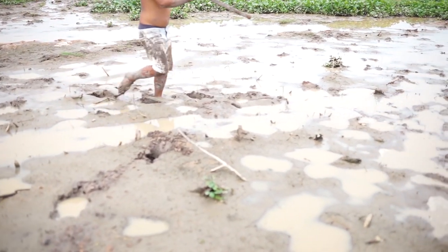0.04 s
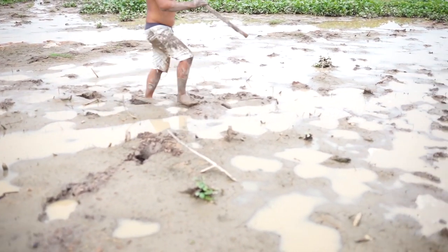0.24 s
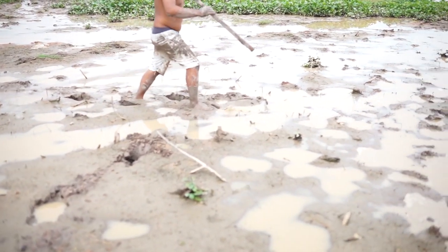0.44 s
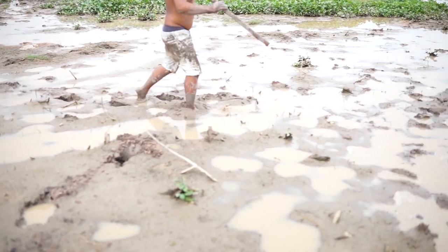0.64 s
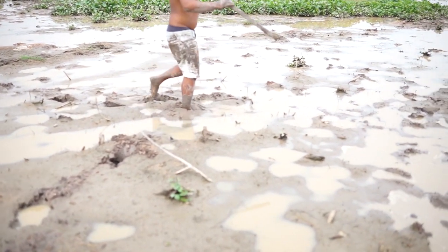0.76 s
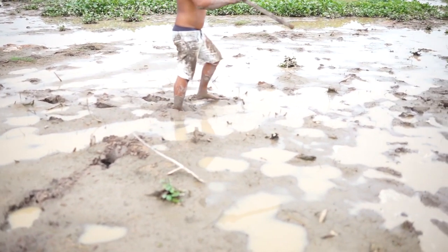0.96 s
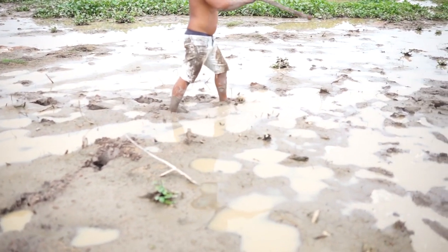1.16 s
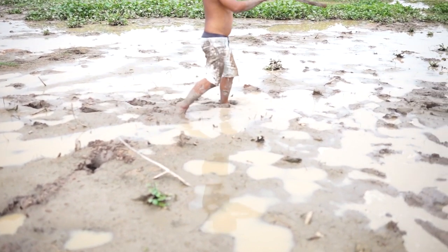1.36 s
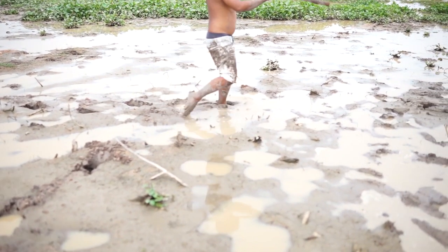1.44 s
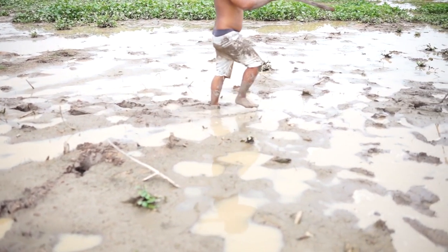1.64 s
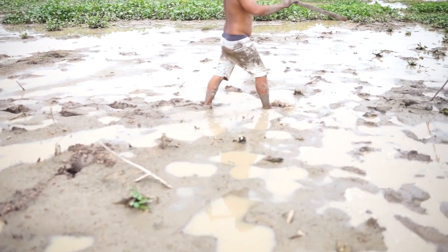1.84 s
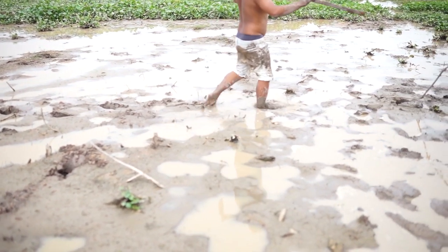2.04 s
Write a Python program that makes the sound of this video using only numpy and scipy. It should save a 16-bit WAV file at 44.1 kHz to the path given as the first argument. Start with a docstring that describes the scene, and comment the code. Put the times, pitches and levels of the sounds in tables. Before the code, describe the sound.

Wet, sucking barefoot steps in a flooded mud field, with low gusts of wind.

```python
"""Bare feet wading through a flooded mud field, a few metres from a stereo microphone.
Mud slaps, sucks and snaps as it tears loose, air pockets pop, and thrown water falls as fine drops.
Gusts buffet the microphone, mostly its left port, which is also shaded from the walker.
Some small animal trills briefly over the faint hiss of the open air."""
import sys
import numpy as np
from scipy import signal
from scipy.fft import rfft, irfft
from scipy.io import wavfile

SR = 44100
rng = np.random.default_rng(int(sys.argv[2]) if len(sys.argv) > 2 else 0)


def materialize(psi):
    """Save the field psi as 16-bit PCM at rate SR to the path in sys.argv[1].

    A 1-D psi becomes a single channel; in a 2-D psi each row is a channel.
    """
    bounded = np.clip(np.atleast_2d(psi).T, -1, 1)
    quanta = np.round(bounded * 32767).astype(np.int16)
    wavfile.write(sys.argv[1], SR, quanta)


N = 92610

# Mud slapping and tearing loose underfoot.
# Each row: start in seconds, level in dB, centre in Hz, width in octaves, decay in seconds.
MUD_SQUELCHES = [(.0215, -39, 1070, 0.8, 0.0015), (0.822, -39, 1530, 0.27, 0.015),
                 (0.1432, -30.5, 6000, 1.6, 0.0029), (0.3535, -32.5, 2200, 0.99, 0.0096),
                 (0.368, -34, 3220, 1.4, 0.013), (.394, -37, 4600, 0.53, 0.0093),
                 (0.494, -27.5, 4760, 0.86, 0.0031), (0.5022, -28.5, 4870, 0.25, 0.0014),
                 (0.5317, -27, 6500, 0.5, 0.0019), (0.547, -26, 2700, 1.34, 0.0082),
                 (0.614, -30.5, 3400, 4.8, 0.0059), (0.633, -33, 1550, 0.34, 0.0021),
                 (1.0913, -24, 5000, 1.8, 0.0028), (1.0939, -17.5, 5200, 0.83, 0.0018),
                 (1.1411, -23.5, 5700, 1.4, 0.0019), (1.153, -29, 6000, 1.4, 0.0024),
                 (1.163, -17.5, 4840, 1.9, 0.003), (1.1785, -19, 2770, 0.3, 0.0015),
                 (1.372, -35, 4800, 1.1, 0.0097), (1.396, -36, 3000, 1.8, 0.0092),
                 (1.554, -39.5, 4460, 1.6, 0.0081), (1.802, -27.5, 7200, 0.81, 0.0051),
                 (1.848, -29.5, 5200, 0.76, 0.01), (2.031, -19.5, 1990, 0.57, 0.0011),
                 (2.051, -35, 3600, 1.3, 0.0025), (2.064, -34.5, 4200, 0.91, 0.0058),
                 (2.0857, -28.5, 3900, 0.58, 0.0017), (2.092, -23, 2000, 0.81, 0.0018)]
# Films of mud parting. Each row: time in seconds, peak in dB, centre in Hz, width in octaves.
MUD_SNAPS = [(.1433, -16, 9800, 0.36), (.5033, -22, 5400, .5), (.5323, -17, 8500, 0.32),
             (0.548, -24, 3000, 0.71), (1.095, -15, 8600, 0.88), (1.142, -26, 6300, .8),
             (1.1645, -7.5, 6060, 0.54), (1.1781, -12, 3000, 0.84)]
# Air pockets popping in the mud.
# Each row: start in seconds, pitch in Hz, gain in dB, decay in seconds, glide in octaves per second.
AIR_POCKETS = [(.021, 846, -14, 0.00097, 10), (.1435, 2260, -26.5, 0.0013, 0),
               (0.357, 2450, -23, 0.0009, 23), (.373, 4300, -27.5, 0.0023, 46),
               (0.452, 1910, -38, 0.0058, -9), (0.509, 4440, -39, 0.0024, -9),
               (0.496, 4000, -29, 0.0028, 56), (0.5487, 825, -31, 0.0063, 8),
               (0.633, 1296, -30.5, 0.0075, 12), (0.6385, 1700, -30.5, 0.0051, 74),
               (0.781, 905, -33, 0.0059, 17), (0.82, 940, -35.5, 0.0058, 14),
               (1.1619, 1470, -19, 0.0017, 33), (1.1787, 2150, -32.5, 0.0047, -12),
               (1.338, 835, -25.5, 0.0016, 13), (1.343, 2670, -29, 0.0022, 0), (1.42, 926, -36, 0.015, -19),
               (1.423, 2720, -33, 0.0028, -5), (1.753, 2450, -41.5, 0.0068, 7),
               (2.0295, 1036, -20, 0.0035, 20), (2.037, 957, -24, 0.0038, 24),
               (2.042, 2576, -33, 0.0071, -50.5), (2.059, 2750, -22.5, 0.0021, -37),
               (2.068, 716, -24.5, 0.0043, 39), (2.077, 1850, -25, 0.0022, 32),
               (2.0894, 2740, -23.5, 0.0024, 3), (2.091, 1020, -19, 0.0015, 10)]
# Water pushed and thrown by a foot.
# Each row: peak time, rise and fall in seconds, level in dB, centre in Hz, width in octaves.
WATER_SPRAYS = [(.008, 0.032, 0.022, -37, 4560, 5.8), (.1, 0.064, 0.11, -48.5, 5600, 1.1),
                (.45, 0.2, 0.12, -46.5, 3000, 5.7), (.815, 0.12, 0.045, -45, 1740, 0.88),
                (1.04, 0.24, 0.22, -48.5, 4700, 0.29), (1.176, 0.026, 0.0072, -31.5, 6360, 0.43),
                (1.404, 0.054, 0.14, -49, 2120, 0.91), (1.666, 0.042, 0.086, -42, 4100, 1),
                (1.83, 0.023, 0.12, -41, 7350, 0.58), (1.902, 0.029, 0.022, -29, 3440, 1.94),
                (2.085, 0.14, 0.037, -37, 3400, 11)]
# Steady wind on the microphone's ports. Each row: time in seconds, left level in dB, right level in dB.
WIND_LEVELS = [(0, -29, -32), (0.191, -26, -36), (.45, -17, -33.5), (.62, -14.5, -22), (.78, -17, -33.5),
               (1.04, -16.5, -29.5), (1.27, -20, -27), (1.418, -18.5, -29), (1.68, -21, -30.5),
               (1.82, -32.5, -39), (2.1, -34, -38)]
# The spectrum of that wind. Each row: frequency in Hz, relative level in dB.
WIND_SPECTRUM = [(12, -24), (25, -7.5), (45, 0), (70, 2.5), (115, -1.5), (160, -12), (250, -22.5),
                 (400, -35.5), (800, -54)]
# Eddies thumping one port. Each row: peak time in seconds, half length in seconds, level in dB,
# corner in Hz, port (0 left, 1 right).
WIND_EDDIES = [(0.052, 0.049, -23, 81, 0), (0.232, 0.012, -14, 83, 0), (0.286, 0.021, -11.5, 76, 0),
               (0.355, 0.0029, -22, 358, 1), (0.39, 0.0042, -5.5, 114, 0), (0.423, 0.012, -14.5, 150, 0),
               (.505, 0.0034, -22, 600, 0), (0.512, 0.016, -13.5, 227, 0), (0.539, 0.01, -4.5, 102, 0),
               (0.563, 0.013, -29, 191, 1), (0.584, 0.014, -16.5, 203, 0), (0.65, 0.024, -12, 159, 0),
               (0.674, 0.015, -11.5, 187, 0), (0.764, 0.017, -5.5, 84, 0), (0.795, 0.0072, -8, 203, 0),
               (0.829, 0.018, -15, 271, 0), (0.867, 0.019, -21.5, 177, 1), (0.879, 0.016, -9.5, 214, 0),
               (0.96, 0.011, -9, 197, 0), (1.016, 0.019, -20, 187, 0), (1.129, 0.017, -9.5, 142, 0),
               (1.17, 0.008, -8, 150, 0), (1.211, 0.017, -20, 187, 1), (1.2134, 0.0039, -14.5, 397, 0),
               (1.222, 0.013, -6.5, 171, 0), (1.281, 0.0014, -19.5, 437, 0), (1.305, 0.02, -12.5, 157, 0),
               (1.382, 0.024, -9, 108, 0), (1.428, 0.02, -11.5, 128, 0), (1.492, 0.015, -7.5, 84, 0),
               (1.499, 0.0031, -25, 750, 0), (1.553, 0.0085, -12.5, 140, 0), (1.611, 0.017, -16.5, 140, 0),
               (1.649, 0.0054, -14, 105, 0), (1.766, 0.0078, -22.5, 137, 0), (1.874, 0.034, -25, 75, 0)]
# The animal's calls. Each row: start and length in seconds, pulses per second, pitch in Hz,
# level in dB, second resonance in Hz, its level in dB.
ANIMAL_TRILLS = [(-.06, 0.099, 90, 3030, -43.5, 5500, -49.5), (0.74, 0.17, 92, 3070, -42.5, 5130, -46.5),
                 (1.614, 0.082, 96.7, 5330, -45, 3470, -48)]
# The hiss of the open field. Each row: frequency in Hz, relative level in dB.
AIR_SPECTRUM = [(100, -1.5), (350, 6), (520, -2.5), (700, -4), (1100, -4.5), (1500, -13), (2100, -7.5),
                (3300, -27), (5000, -22.5), (7000, -8), (9300, -4.5), (11000, -15)]
# The shading of the left port from the walker. Each row: frequency in Hz, gain in dB.
LEFT_SHADE = [(500, -3), (1100, 1.5), (2000, -1.5), (3200, -2), (5500, -11), (10000, -6.5)]
# The microphone's treble roll-off. Each row: frequency in Hz, gain in dB.
MIC_TREBLE = [(6500, -0.5), (8000, -7.5), (10500, -15)]


def squelches():
    """Mud slaps and tears loose under a foot: a sharp wet burst, then a weaker dribble."""
    attack_s, dribble_db, dribble_s = 0.00043, -36.5, 0.061
    out, drops = np.zeros(N), droplets(spread_db=2)
    for start, db, hz, octaves, decay in MUD_SQUELCHES:
        age = np.maximum(clock() - start, 0)
        attack = np.minimum(age / attack_s, 1)
        fall = np.exp(-age / decay) + undb(dribble_db) * np.exp(-age / dribble_s)
        burst = even(band(random_shift(drops), hz, octaves), span_s=0.0027)
        out += undb(db) * attack * fall * burst
    return out


def snaps():
    """A film of mud parts all at once, with a dry tick."""
    out = np.zeros(N)
    for when, db, hz, octaves in MUD_SNAPS:
        tick = band(signal.unit_impulse(N, int(when * SR)), hz, octaves)
        out += undb(db) * tick / tick.max()
    return out


def bubbles():
    """Air pockets pop, ring briefly and glide as they change shape."""
    attack_s = 0.0012
    out, age = np.zeros(N + SR), np.arange(SR // 25) / SR
    for start, hz, db, decay, glide in AIR_POCKETS:
        pitch = np.minimum(hz * 2 ** (glide * age), SR / 4)
        envelope = np.minimum(age / attack_s, 1) * np.exp(-age / decay)
        at = int(start * SR)
        out[at:at + len(age)] += undb(db) * envelope * np.sin(2 * np.pi * np.cumsum(pitch) / SR)
    return out[:N]


def sprays():
    """Water thrown by a foot swells and falls away as fine droplets."""
    out, drops = np.zeros(N), droplets(spread_db=6)  # thrown drops vary more in size than a squelch's
    for peak, rise, fall, db, hz, octaves in WATER_SPRAYS:
        age = clock() - peak
        swell = np.exp(-np.maximum(-age / rise, age / fall))
        out += undb(db) * swell * band(random_shift(drops), hz, octaves)
    return out


def droplets(spread_db):
    """Dense tiny drops of uneven size and pitch, each ringing a few rising cycles, in a fine mist."""
    count, drops_per_s, low_hz, high_hz = 10000, 5000, 830, 12000
    decay_cycles, glide = 1.4, 0.019
    when, pitch, size = rng.random(count), rng.random(count), rng.standard_normal(count)
    hz = low_hz + (high_hz - low_hz) * pitch ** 1.5
    steps = np.arange(160)
    cycles = hz[:, None] * steps / SR
    envelopes = np.exp(-cycles / decay_cycles) * (1 - steps / len(steps))
    gains = undb(spread_db * np.minimum(size, 3)) * (hz / high_hz) ** 1.17
    rings = gains[:, None] * envelopes * np.sin(2 * np.pi * cycles * (1 + glide * cycles))
    starts = (when * count / drops_per_s * SR).astype(int)
    stream = np.bincount((starts[:, None] + steps).ravel(), rings.ravel())
    mist = 0.5 * noise()
    return unit(np.resize(stream, N)) + mist


def stray_drops():
    """Stray drops tick back into the puddles around the walker."""
    drops_per_s, spread_db, level_db = 79, 4, -58.5
    hits = rng.random(N) < drops_per_s / SR
    sizes = undb(spread_db * np.clip(noise(), -2, 2))
    return undb(level_db) * band(hits * sizes, hz=3350, octaves=1.83)


def wind():
    """Wind right on the microphone: a low churning on each port, and eddies that thump against it."""
    port_low_hz, port_high_hz, eddy_order = 38, 820, 2.99
    out = np.zeros((2, N))
    times, *levels = np.array(WIND_LEVELS).T
    for port, db in enumerate(levels):
        churn = even(colour(noise(), WIND_SPECTRUM), span_s=0.13)
        out[port] = undb(np.interp(clock(), times, db)) * churn
    port_band = 1 / np.sqrt((1 + (port_low_hz / bins()) ** 4) * (1 + (bins() / port_high_hz) ** 4))
    for peak, half_length, db, corner_hz, port in WIND_EDDIES:
        lowpass = 1 / np.sqrt(1 + (bins() / corner_hz) ** (2 * eddy_order))
        eddy = irfft(rfft(noise()) * port_band * lowpass, N)
        swell = np.exp(-.5 * ((clock() - peak) / half_length) ** 2)
        out[port] += undb(db) * swell * even(eddy, span_s=0.022)
    return out


def trills():
    """A small animal: fast, uneven pulses on an arched tone, rasping at its octave and a resonance."""
    jitter_cycles, arch_hz, octave_db, rasp_octaves = 0.072, 183, -6, 0.086
    out = np.zeros(N)
    for start, length, rate, hz, db, second_hz, second_db in ANIMAL_TRILLS:
        age = clock() - start
        swell = np.sin(np.pi * np.clip(age / length, 0, 1))
        beat = rate * age + jitter_cycles * band(noise(), hz=35, octaves=0.7)
        pulses = unit(np.sin(np.pi * beat) ** 2)
        narrow_noise = band(noise(), hz, octaves=190 / hz)
        phase = np.angle(signal.hilbert(narrow_noise))  # an unsteady pitch at a steady level
        phase += 2 * np.pi * np.cumsum(arch_hz * (swell - 1)) / SR
        tone = unit(np.sin(phase)) + undb(octave_db) * band(noise(), 2 * hz, rasp_octaves)
        resonance = band(noise(), second_hz, rasp_octaves)
        out += swell * pulses * (undb(db) * tone + undb(second_db) * resonance)
    return out


def across_field(x):
    """A few metres to the microphone: direct sound, a little late on the left, and ground scatter."""
    left_lag_s, scatter_db, scatter_s = 0.00002, -7, 0.026
    age = np.arange(SR // 4) / SR
    tails = rng.standard_normal((2, len(age))) * np.exp(-age / scatter_s)
    tails /= np.sqrt(np.sum(tails ** 2, axis=1, keepdims=True))
    scatter = signal.fftconvolve(x[None], tails, axes=1)[:, :N]
    left = irfft(rfft(x) * np.exp(-2j * np.pi * bins() * left_lag_s), N)
    return np.array([left, x]) + undb(scatter_db) * scatter


def open_air():
    """Faint steady hiss of the open field, wide across the two channels."""
    level_db, shared_power = -43.5, 0.2
    centre = np.sqrt(shared_power) * noise()
    sides = np.sqrt(1 - shared_power) * np.array([noise(), noise()])
    return undb(level_db) * unit(colour(centre + sides, AIR_SPECTRUM))


def undb(db):
    """Decibels to gain."""
    return 10 ** (np.asarray(db) / 20)


def clock():
    """Time of every sample in seconds."""
    return np.arange(N) / SR


def bins():
    """Frequency of every spectral bin in Hz, at least 1."""
    return np.maximum(np.arange(N // 2 + 1) * SR / N, 1)


def noise():
    """White noise."""
    return rng.standard_normal(N)


def unit(x):
    """Scale to rms 1."""
    return x / np.sqrt(np.mean(x ** 2))


def even(x, span_s):
    """Hold a noise at rms 1 over the given span."""
    window = signal.windows.hann(int(2 * span_s * SR) + 3)
    power = signal.fftconvolve(x ** 2, window / window.sum(), "same")
    return x / np.sqrt(np.abs(power) + 1e-12)


def colour(x, points):
    """Filter through (Hz, dB) points."""
    hz, db = np.array(points).T
    gain = undb(np.interp(np.log(bins()), np.log(hz), db))
    return irfft(rfft(x) * gain, N)


def band(x, hz, octaves):
    """Bell-shaped band at rms 1."""
    bell = np.exp(-.5 * (np.log2(bins() / hz) / octaves) ** 2)
    return unit(irfft(rfft(x) * bell, N))


def random_shift(x):
    """The same stream, looped from a random point."""
    return np.roll(x, rng.integers(N))


def scene():
    """The walker and the animal out in the field, shaded on the left, with wind on the microphone."""
    wading = squelches() + snaps() + bubbles() + sprays() + stray_drops()
    left, right = across_field(wading + trills()) + open_air()
    return np.array([colour(left, LEFT_SHADE), right]) + wind()


def record(dry):
    """The microphone softens the treble, rounds the strongest gusts and cuts off the top."""
    ceiling, top_hz = 0.86, 11000
    softened = colour(dry, MIC_TREBLE)
    rounded = softened / (1 + (softened / ceiling) ** 8) ** (1 / 8)
    lowpass = signal.ellip(10, .2, 80, top_hz, fs=SR, output="sos")
    return signal.sosfilt(lowpass, rounded)


dry = scene()
out = record(dry)
materialize(out)
```